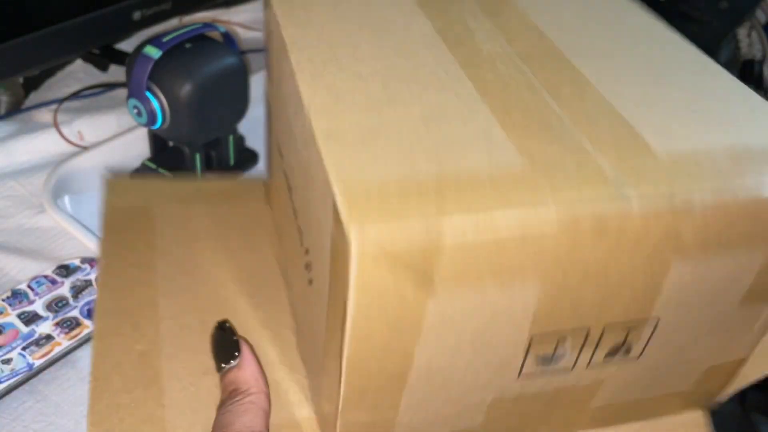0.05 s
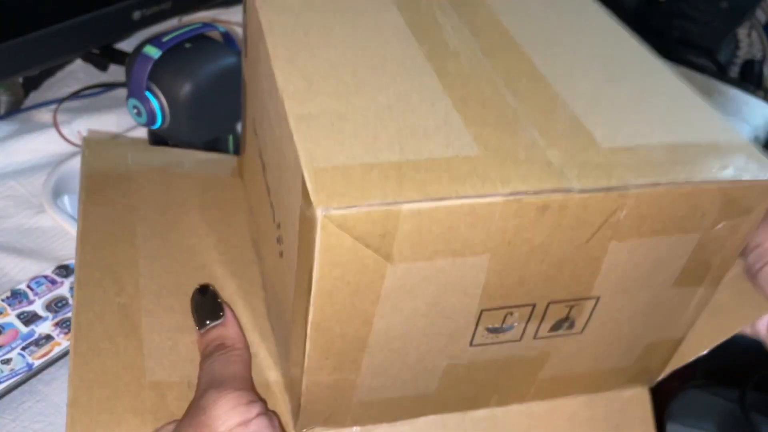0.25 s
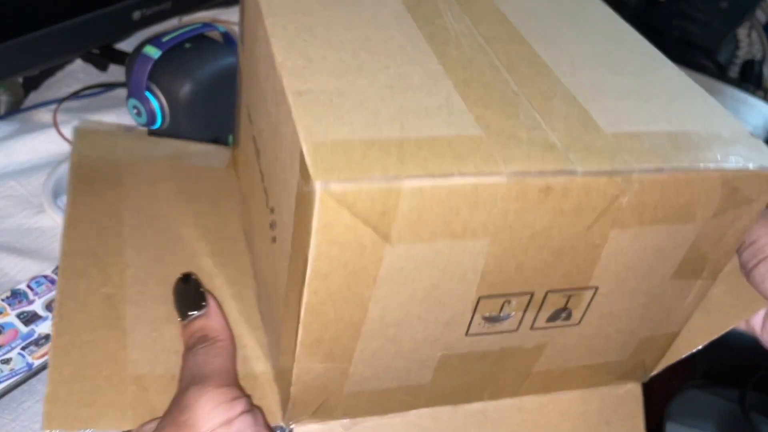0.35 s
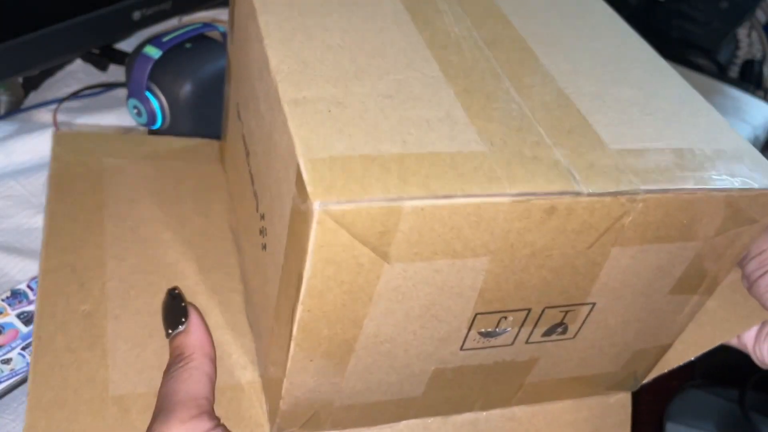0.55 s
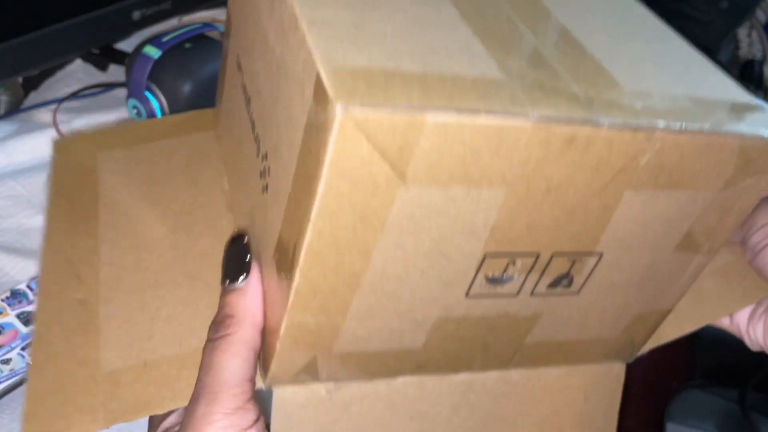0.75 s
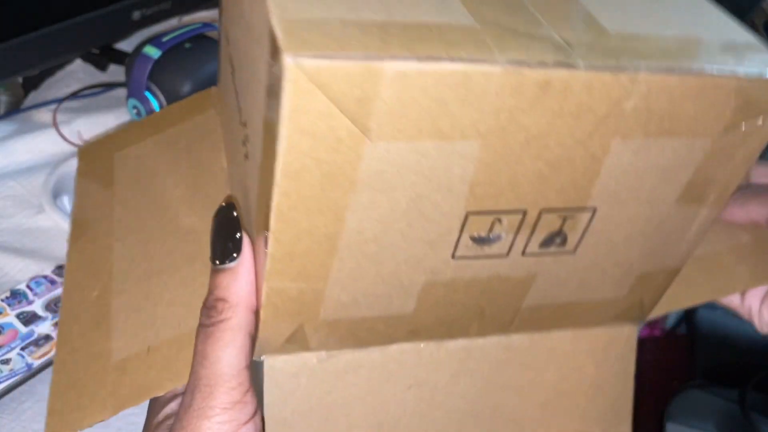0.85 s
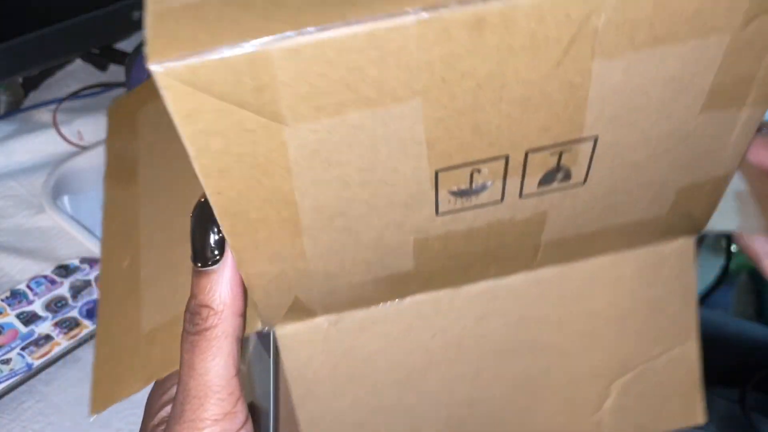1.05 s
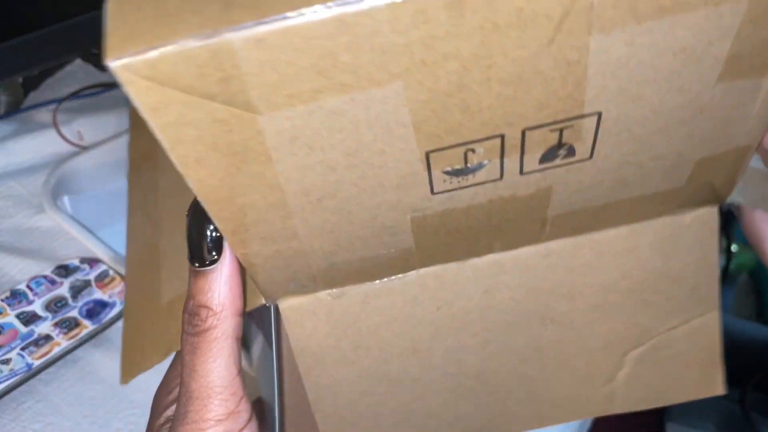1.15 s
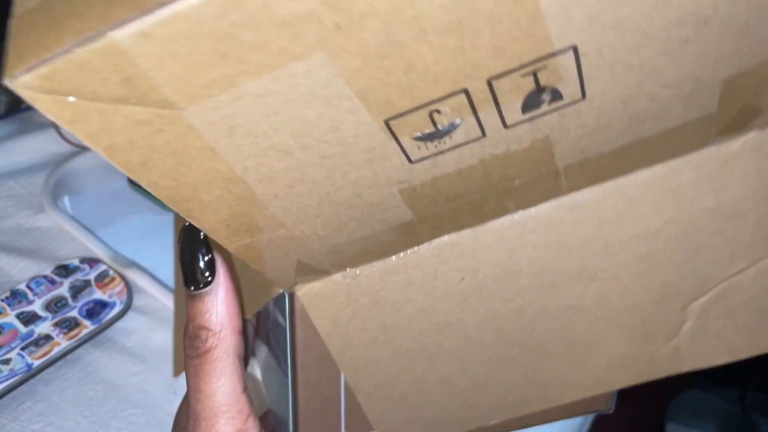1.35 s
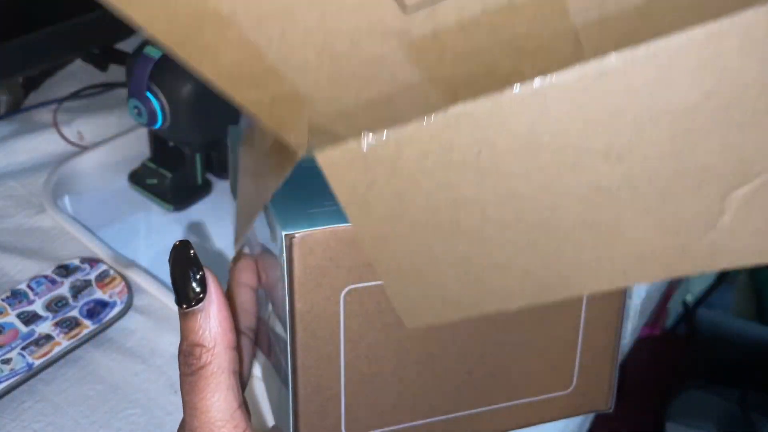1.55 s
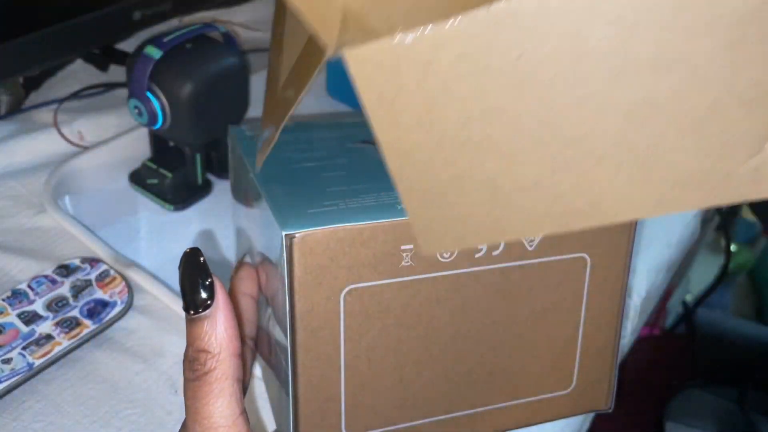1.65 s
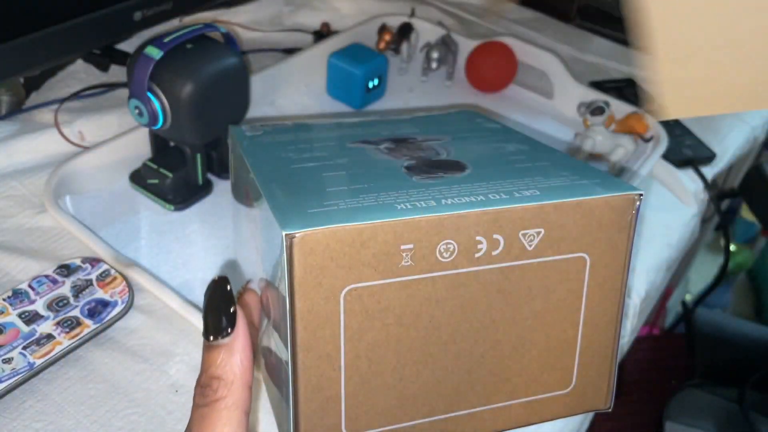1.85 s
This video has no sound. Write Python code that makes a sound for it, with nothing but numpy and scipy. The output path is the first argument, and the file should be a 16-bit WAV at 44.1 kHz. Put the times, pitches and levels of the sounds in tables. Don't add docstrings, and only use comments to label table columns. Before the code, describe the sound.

Cardboard box unpacking: hollow bumps, board scraping on board, nail ticks and soft table thumps

```python
import sys
import numpy as np
from scipy import signal
from scipy.fft import rfft, irfft
from scipy.io import wavfile
from scipy.ndimage import uniform_filter1d

SR = 44100
rng = np.random.default_rng(int(sys.argv[2]) if len(sys.argv) > 2 else 0)


def persist_wave(psi):
    counts = np.round(np.clip(psi, -1, 1) * 32767).astype(np.int16)
    wavfile.write(sys.argv[1], SR, np.atleast_2d(counts).T)


def linear_from_db(decibels):
    return 10 ** (np.asarray(decibels, float) / 20)


N = 83790


def colour(x, table):
    f = np.arange(N // 2 + 1) * SR / N + 1
    hz, db = np.array(table).T
    y = irfft(rfft(x) * linear_from_db(np.interp(np.log(f), np.log(hz), db)), N)
    return y / np.std(y)


def band(x, hz, width):
    return signal.lfilter(*signal.iirpeak(min(hz, 0.4 * SR), 1 / width, SR), x)


def butter(x, order, hz, kind="low"):
    return signal.sosfilt(signal.butter(order, hz, kind, fs=SR, output="sos"), x)


def ring(x, hz, t60):
    pole = np.exp(2j * np.pi * hz / SR - np.log(1000) / (t60 * SR))
    return signal.lfilter([1], [1, -pole], x).imag


def walk(rate):
    hold = int(SR / rate)
    steps = np.repeat(rng.standard_normal(N // hold + 1), hold)
    return 1.2 * uniform_filter1d(steps, hold)[:N]


def add(out, s, x, db):
    i = int(s * SR)
    out[i:i + len(x)] += (x * linear_from_db(db) / np.abs(x).max())[:N - i]


# pitch_hz, level_db, t60_s
CARTON_MODES = [(150, -8, .09), (205, -6, .08), (283, 0, .17), (335, -5, .08), (395, -6, .07),
                (493, 0, .13), (575, -7, .06), (695, -7, .06), (900, -10, .04), (1070, -8, .04),
                (1270, -6, .04), (1500, -9, .035), (1980, -13, .03)]
# start_s, peak_db, favoured pitch_hz, ring_share (of the modes' t60)
WALL_KNOCKS = [(0.137, -33.5, 1067, 0.8), (0.177, -28, 375.5, 1), (.179, -30, 1003, 0.7),
               (.212, -28, 1090, 0.44), (0.214, -18.5, 361.7, 0.7), (0.231, -34.5, 273, 0.38),
               (.243, -31, 610, 0.18), (0.2507, -15, 710, 0.41), (.251, -17, 1220, 0.27),
               (0.2556, -14.5, 345, 0.11), (.2875, -29.5, 994, 0.37), (.305, -24.5, 627, 0.33),
               (.3862, -5.5, 1257, 0.51), (.388, -8, 498, 0.58), (.391, -14, 266.6, 0.52),
               (0.4049, -11, 277, 0.19), (.545, -53, 325, 0.51), (.581, -24.5, 427, 0.76),
               (0.598, -31, 308.3, 0.41), (.625, -25.5, 455, 0.34), (0.776, -39, 486, 1),
               (1.165, -32.5, 508, 0.94), (1.18, -29.5, 293, 0.62), (1.266, -38, 923, 0.35),
               (1.479, -45, 300, 0.16), (1.581, -29.5, 418, 0.45), (1.629, -33.5, 506, 0.52),
               (1.636, -32, 307.5, 0.73), (1.654, -26, 583, 0.45), (1.729, -34, 1162, 0.26)]
KNOCK_OCTAVES = 0.34
KNOCK_RISE_CYCLES, KNOCK_SCATTER_DB = 0.6, 2
DAMPED_AFTER_S = 0.059


def knocks():
    out, t = np.zeros(N), np.arange(8192) / SR
    modes = np.array(CARTON_MODES)
    mode_hz, mode_db, mode_t60 = modes.T
    chance = rng.standard_normal((len(WALL_KNOCKS), 2, len(modes)))
    for (s, db, hz, share), (level_luck, pitch_luck) in zip(WALL_KNOCKS, chance):
        nearness = np.exp(-0.5 * (np.log2(mode_hz / hz) / KNOCK_OCTAVES) ** 2)
        strength = nearness * linear_from_db(mode_db / 2 + KNOCK_SCATTER_DB * level_luck)
        grip = hz / mode_hz[np.argmin(np.abs(np.log(mode_hz / hz)))]
        pitches = grip * mode_hz * (1 + 0.015 * pitch_luck)
        decay = linear_from_db(-60 * t / (share * mode_t60[:, None]))
        tones = np.sin(2 * np.pi * np.outer(pitches, t)) * decay
        rise = 1 - np.exp(-t * hz / KNOCK_RISE_CYCLES)
        choke = np.exp(-(t / DAMPED_AFTER_S) ** 4)
        add(out, s, strength @ tones * rise * choke, db)
    return out


# centre_s, peak_db, pitch_hz
BRIEF_TONES = [(.006, -43.5, 650), (.008, -46, 459), (.139, -41.5, 476), (.187, -35, 457),
               (0.217, -45, 1038), (0.235, -41, 1830), (.237, -40, 1950), (.256, -29.5, 1193),
               (0.258, -20.5, 350), (.277, -61, 304), (.296, -28.5, 231), (.309, -30, 318),
               (0.336, -41, 290), (0.348, -39.5, 1317), (.351, -47, 772), (0.355, -36, 376),
               (.412, -30, 916), (.417, -25, 698), (0.417, -26, 296), (.42, -32, 1220), (0.435, -35, 1323),
               (.443, -33.5, 648), (0.502, -39, 472), (.52, -35.5, 499), (.54, -34.5, 574),
               (.564, -33, 394), (.583, -36, 963), (0.592, -34, 292), (.602, -40, 790), (0.616, -34, 437),
               (.615, -45.5, 1195), (0.635, -38, 397), (.646, -43.5, 1242), (0.656, -37, 326),
               (.836, -40, 530), (.869, -43.5, 841), (.93, -42, 260), (0.965, -43.5, 477),
               (0.978, -40, 464), (0.98, -54, 277), (1.012, -42, 563), (1.035, -38.5, 239),
               (1.047, -37.5, 1082), (1.06, -39, 262), (1.079, -36, 503), (1.087, -46, 1873),
               (1.134, -44.5, 2400), (1.112, -40, 274), (1.166, -45, 1764), (1.17, -34.5, 234),
               (1.197, -30.5, 271), (1.2, -42.5, 512), (1.485, -35.5, 204), (1.534, -39.5, 525),
               (1.583, -44, 1276), (1.586, -29.5, 381), (1.586, -37.5, 630), (1.626, -39, 440),
               (1.645, -29, 239), (1.653, -43, 1398)]
BRIEF_TONE_S = 0.024


def brief_tones():
    out, u = np.zeros(N), np.linspace(0, 1, int(BRIEF_TONE_S * SR))
    swell = np.sin(np.pi * u ** 0.86) ** 2.08
    for s, db, hz in BRIEF_TONES:
        add(out, max(s - BRIEF_TONE_S / 2, 0), swell * np.sin(2 * np.pi * hz * BRIEF_TONE_S * u), db)
    return out


# time_s, level_db, hiss_db (over it), boom_db (of the walls over it)
RUB_COURSE = [(0, -49, 5, 1.5), (0.099, -58, 9, -2), (0.193, -52, 9.5, -2), (0.249, -31.5, 1, 4.5),
              (.275, -51.5, 4.5, 2.5), (.37, -51, 4, 5.5), (0.419, -47.5, -1, -15), (.52, -48.5, 1.5, 6),
              (.62, -44.5, 4.5, -7), (.8, -53.5, 13, 6), (.91, -50.5, 2, 2), (1.001, -45, 1.5, -2.5),
              (1.166, -44.5, 1, -6), (1.215, -67.5, 8.5, 5.5), (1.45, -60.5, 6.5, 2.5),
              (1.56, -52.5, 10, 5), (1.691, -63, 2, 5), (1.8, -65.5, -0.5, -12)]
# frequency_hz, density_db (per Hz)
BOARD_COLOUR = [(410, 2.5), (700, -2.5), (1110, -6.5), (1770, -12), (2220, -9), (6740, -22), (13500, -31.5),
                (15200, -26), (16000, -53)]
SLIPS_PER_S, SLIP_SCATTER_DB = 5000, 2.5
RUB_LOW_HZ, RUB_TILT_HZ = 450, 5000
GRAIN_DB, BOOM_DB = 4.5, 5
CLUMPY_DB, PATCHY_DB, WALL_PATCHY_DB = 3.5, 1.2, 3.5
RUBBED_RING = 0.28
WALL_TILT_DB_OCT = 4


def rub():
    time_s, *courses = np.array(RUB_COURSE).T
    level, hiss, boom = (np.interp(np.arange(N) / SR, time_s, c) for c in courses)

    moment, direction, size = rng.random((3, N))
    slips = (moment < SLIPS_PER_S / SR) * np.sign(direction - 0.5)
    slips = slips * linear_from_db(-SLIP_SCATTER_DB * np.log(size + 0.005))

    grain = colour(slips / slips.std() + 1.37 * rng.standard_normal(N), BOARD_COLOUR)
    grain = butter(grain, 2, RUB_LOW_HZ, "high")
    low = signal.sosfiltfilt(signal.butter(2, RUB_TILT_HZ, fs=SR, output="sos"), grain)
    clump = walk(39.1)
    streaky = np.zeros(N)
    for k, hz in enumerate(450 * 1.17 ** np.arange(17)):
        streaky += linear_from_db(CLUMPY_DB * np.roll(clump, 3571 * k)) * band(low, hz, 0.1)
    board = streaky * low.std() / streaky.std()
    board += (grain - low) * linear_from_db(hiss + PATCHY_DB * walk(28.95))

    walls = np.zeros(N)
    for hz, db, t60 in CARTON_MODES:
        tilted = db + WALL_TILT_DB_OCT * np.log2(hz / 300)
        walls += linear_from_db(tilted + WALL_PATCHY_DB * walk(24.53)) * ring(slips, hz, RUBBED_RING * t60)
    return linear_from_db(level) * (linear_from_db(GRAIN_DB) * board + linear_from_db(BOOM_DB + boom) * walls / walls.std())


# start_s, length_s, pitch_hz, level_db
SQUEAKS = [(0.937, 0.034, 2120, -50), (0.992, 0.059, 1137, -43), (0.987, 0.039, 1306, -43.5),
           (1.524, .07, 1500, -54), (1.02, 0.063, 570, -46.5), (1.027, 0.058, 1830, -48),
           (1.044, 0.032, 1580, -46.5), (1.055, 0.039, 2340, -44.5), (1.084, 0.036, 2570, -49),
           (1.096, 0.1, 512, -39), (1.101, 0.04, 1410, -44.5), (1.11, 0.037, 1130, -49),
           (1.459, 0.057, 712, -50)]
SQUEAK_CYCLES = 58


def pull():
    out = np.zeros(N)
    for (s, length, hz, db), noise in zip(SQUEAKS, rng.standard_normal((len(SQUEAKS), 8192))):
        n = int(length * SR)
        sung = ring(noise, hz, SQUEAK_CYCLES / hz)[-n:]
        add(out, s, sung * np.sqrt(np.hanning(n)), db + 7.5)
    return out


# start_s, peak_db, pitch_hz, cycles
TABLE_THUMPS = [(0.146, -26.5, 132, 0.9), (0.2581, -9.5, 119, 1.27), (0.295, -32, 107, 2.3),
                (0.34, -21.5, 104, 1.6), (0.547, -33.5, 110, 1.8), (0.588, -23.5, 97.7, 1.43),
                (0.901, -40.5, 135, 3.3), (1.149, -29.5, 156, 2.1), (1.267, -31, 86.5, 2.04),
                (1.485, -37, 148, 4), (1.557, -32, 64.7, 2.4), (1.633, -27, 97, 1.12)]


def thumps():
    out = np.zeros(N)
    for s, db, hz, cycles in TABLE_THUMPS:
        u = np.linspace(0, 1, int(cycles / hz * SR))
        add(out, s, np.sin(np.pi * u) * np.cos(2 * np.pi * cycles * u), db)
    return out


# start_s, peak_db, centre_hz, t60_s
NAIL_TICKS = [(0.1407, -26, 10800, 0.0091), (.1398, -30, 15500, 0.005), (.140, -39.5, 2700, 0.059),
              (0.212, -50, 2970, 0.016), (0.253, -31, 4020, 0.06), (0.335, -43.5, 3770, 0.043),
              (0.3856, -16.5, 3080, 0.014), (0.39, -24, 2160, 0.12), (.495, -34, 1800, 0.023),
              (.583, -29.5, 920, 0.1), (1.582, -41, 1260, 0.052), (1.625, -38.5, 1360, 0.11),
              (1.642, -43, 2500, 0.032), (0.608, -36, 7750, 0.033), (0.6229, -33.5, 3250, 0.047),
              (0.944, -40, 3660, 0.033), (0.995, -38.5, 2700, 0.028), (1.265, -49.5, 3680, 0.049),
              (1.3895, -46, 3620, 0.046), (1.4696, -46.5, 3560, 0.04), (1.484, -48, 11200, 0.18),
              (1.516, -44, 11500, .05), (1.572, -43, 6140, 0.053), (1.7288, -39.5, 4000, 0.039)]
# start_s, peak_db, centre_hz, t60_s
MORE_TICKS = [
    (.1398, -18, 8800, 0.0087),
    (.2505, -31, 10300, 0.022),
    (.2872, -30.5, 1090, 0.023),
    (.335, -43.5, 9500, .03),
    (1.6235, -36.5, 885, 0.042),
    (1.7287, -43, 4500, .012),
    (1.894, -50.5, 1780, .03),
]
TICK_WIDTH = 0.55
TICK_RISE = 0.023


def ticks(table):
    out, t = np.zeros(N), np.arange(4096) / SR
    for (s, db, hz, t60), noise in zip(table, rng.standard_normal((len(table), 4096))):
        burst = noise * linear_from_db(-60 * t / t60) * (1 - np.exp(-t / (TICK_RISE * t60)))
        add(out, s, band(band(burst, hz, TICK_WIDTH), hz, 2 * TICK_WIDTH), db)
    return out


HUM_HZ, HUM_DB, HUM_SWAY_DB = 57.75, -34.5, 0.6
HUM_SECOND_DB, HUM_SIDE_DB = -42, -22


def hum():
    turn = 2 * np.pi * HUM_HZ * np.arange(N) / SR
    tone = -np.sin(turn) + linear_from_db(HUM_SECOND_DB) * np.sin(2 * turn)
    tone = linear_from_db(HUM_DB + HUM_SWAY_DB * walk(6.6)) * np.sqrt(2) * tone
    return tone * (1 + linear_from_db(HUM_SIDE_DB) * np.array([[-1], [1]]))


# frequency_hz, density_db (per Hz)
ROOM_COLOUR = [(53, -24), (90, 3.5), (255, -3.5), (290, -3.5), (368, -12.5), (478, -5), (521, -26.5),
               (2710, -67), (16000, -102)]
ROOM_DB = -52.5


def room_air():
    return linear_from_db(ROOM_DB) * colour(rng.standard_normal(N), ROOM_COLOUR)


ECHO_DB, ECHO_T60_S, ECHO_HZ, ECHO_TOP_HZ = -13.5, 0.46, 1500, 5000
WIDE_DB, WIDE_HZ = -9, 1770
SCATTER_DB, SCATTER_HZ = -12, 5500


def reflect(x, tail):
    return signal.fftconvolve(x, tail / np.linalg.norm(tail))[:N]


def surroundings(box):
    t = np.arange(16384) / SR
    tails = band(rng.standard_normal((2, 16384)) * linear_from_db(-60 * t / ECHO_T60_S), ECHO_HZ, 2.22)
    spread = band(rng.standard_normal(16384) * linear_from_db(-60 * t / 0.042), WIDE_HZ, 4.8)
    glint = rng.standard_normal(256) * linear_from_db(-60 * t[:256] / 0.036)
    dull = butter(box, 6, ECHO_TOP_HZ)
    bright = butter(box, 4, SCATTER_HZ, "high")
    side = linear_from_db(WIDE_DB) * reflect(dull, spread) + linear_from_db(SCATTER_DB) * reflect(bright, glint)
    echo = np.array([reflect(dull, tail) for tail in tails])
    return np.array([box + side, box - side]) + linear_from_db(ECHO_DB) * echo


def scene():
    carton = knocks() + brief_tones() + rub() + pull()
    contacts = thumps() + ticks(NAIL_TICKS) + ticks(MORE_TICKS)
    return surroundings(carton + contacts + room_air()) + hum()


def low_pass(x):
    return signal.sosfilt(signal.butter(12, 17650, fs=SR, output="sos"), x)


# frequency_hz, lag_half_turns
PORT_LAG = [(100, 0), (3000, -.15), (6100, .12), (6900, .93), (8400, 1.07), (9700, 2), (12300, 2),
            (13600, 2.97), (14900, 3), (15500, 2.8), (20000, 2.8)]
LEFT_DB, RIGHT_DB = 2.5, 4
LOW_CUT_HZ = 45


def record(dry):
    f = np.arange(N // 2 + 1) * SR / N
    hz, half_turns = np.array(PORT_LAG).T
    phase = -np.pi * np.interp(f, hz, half_turns)
    left_gain = np.log(linear_from_db(LEFT_DB)) * np.exp(-np.log2((f + 1) / 3500) ** 2)
    right_gain = np.log(linear_from_db(RIGHT_DB)) * np.exp(-4 * np.log2((f + 1) / 600) ** 2)
    lead = (1j * phase + left_gain - right_gain) / 2
    dry = butter(dry, 2, LOW_CUT_HZ, "high")
    mix = irfft(rfft(dry) * np.exp(np.outer([1, -1], lead)), N)
    return low_pass(mix)


dry = scene()
out = record(dry)
persist_wave(out)
```